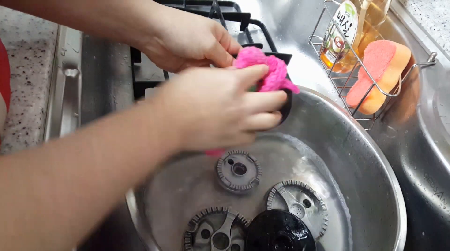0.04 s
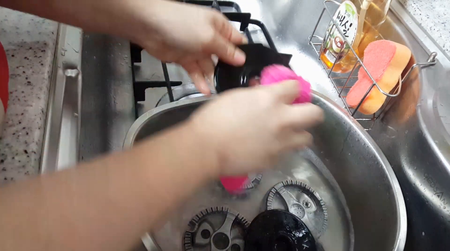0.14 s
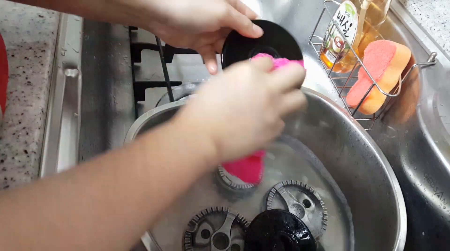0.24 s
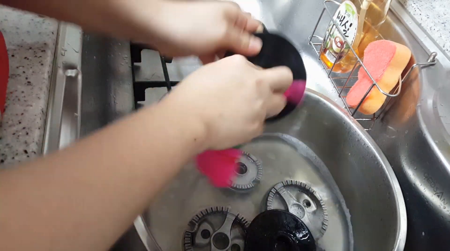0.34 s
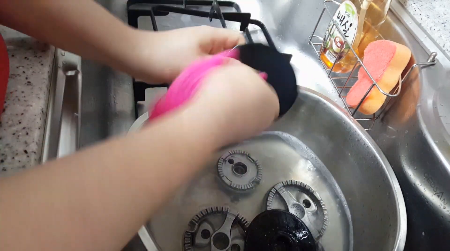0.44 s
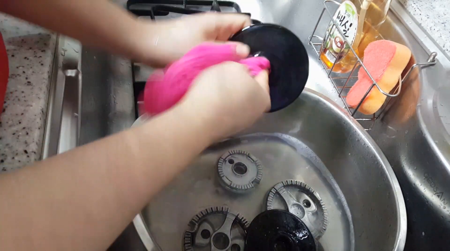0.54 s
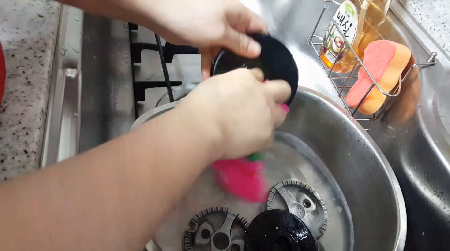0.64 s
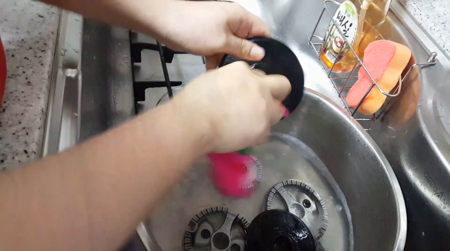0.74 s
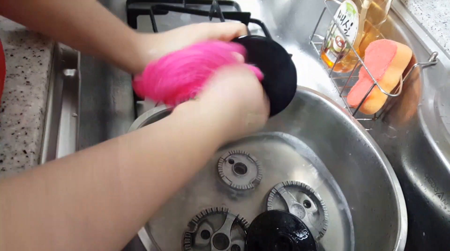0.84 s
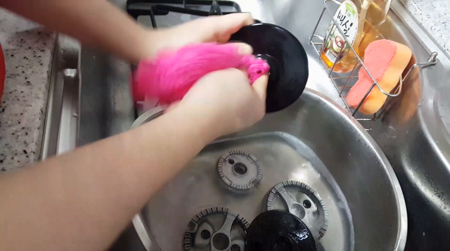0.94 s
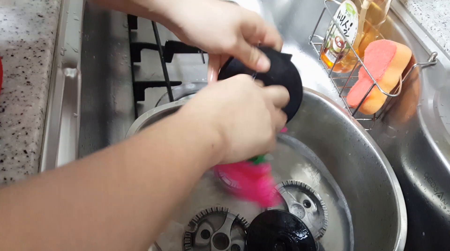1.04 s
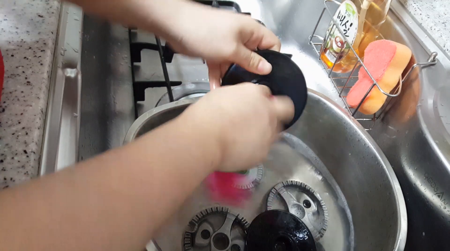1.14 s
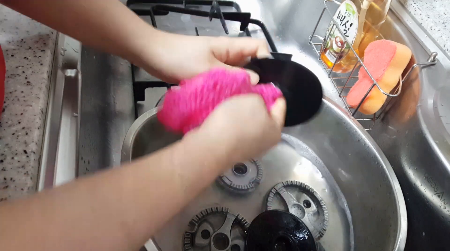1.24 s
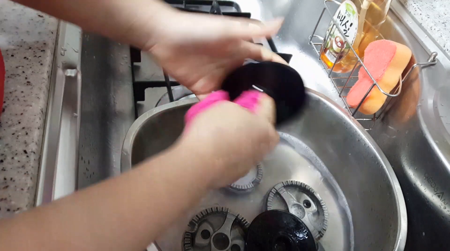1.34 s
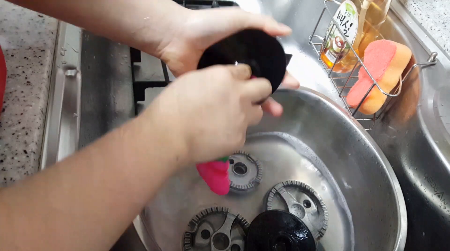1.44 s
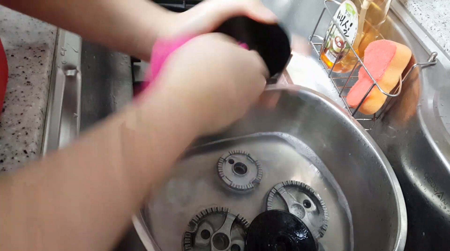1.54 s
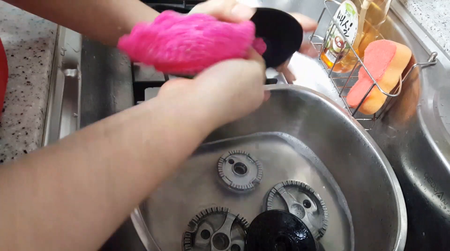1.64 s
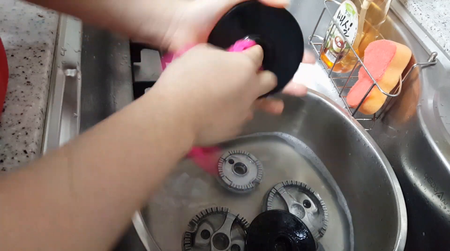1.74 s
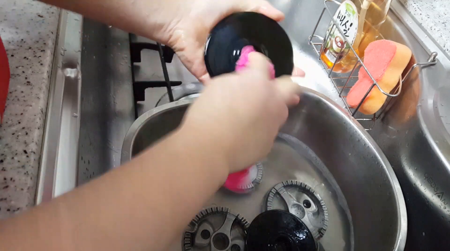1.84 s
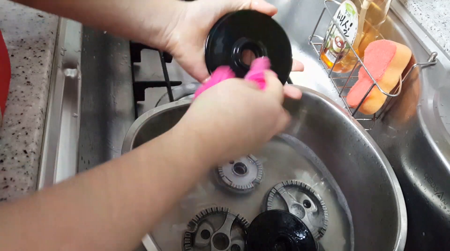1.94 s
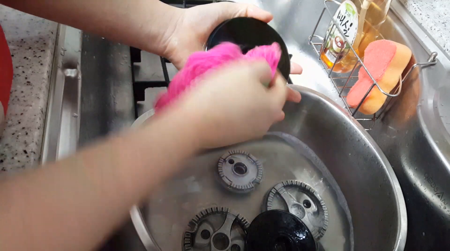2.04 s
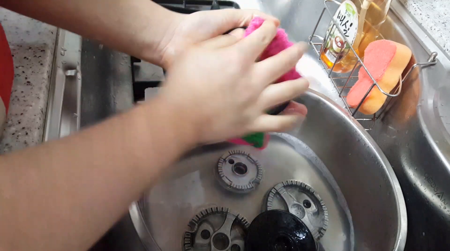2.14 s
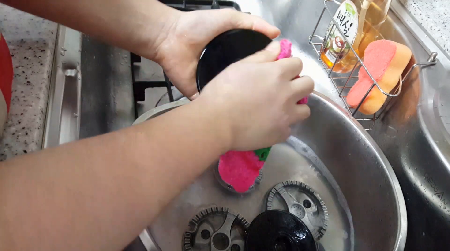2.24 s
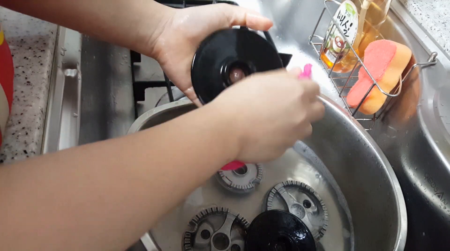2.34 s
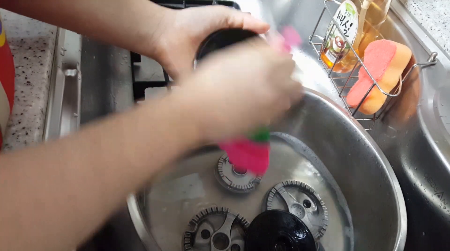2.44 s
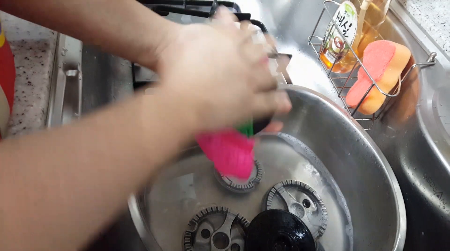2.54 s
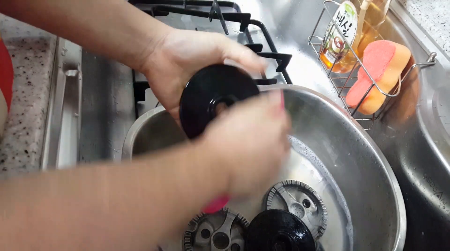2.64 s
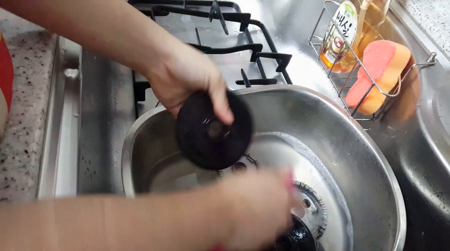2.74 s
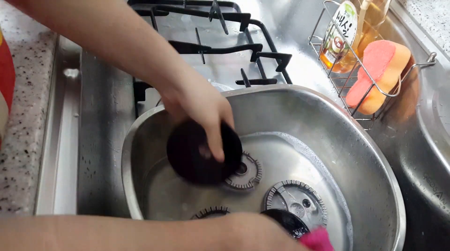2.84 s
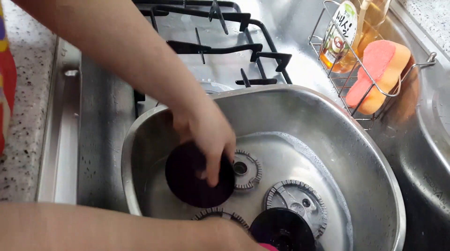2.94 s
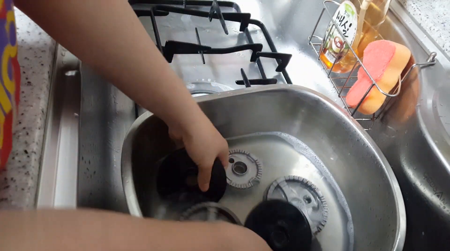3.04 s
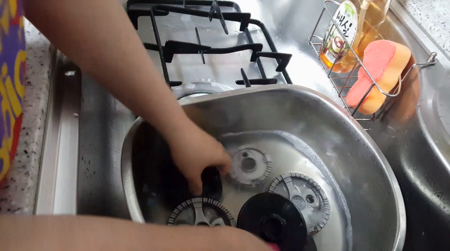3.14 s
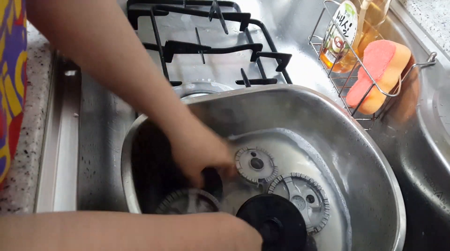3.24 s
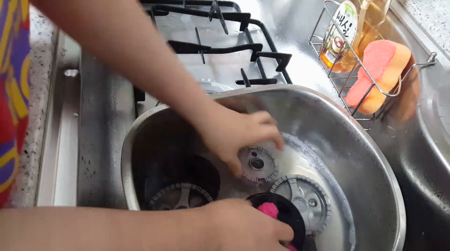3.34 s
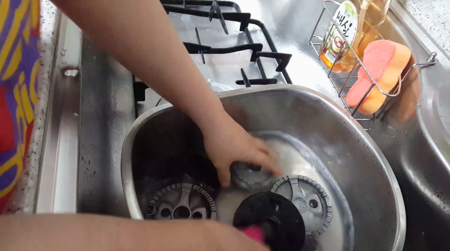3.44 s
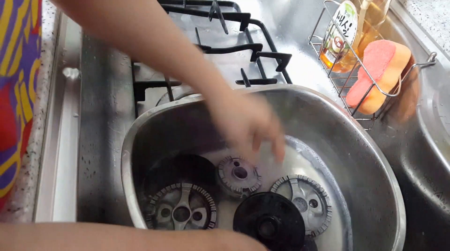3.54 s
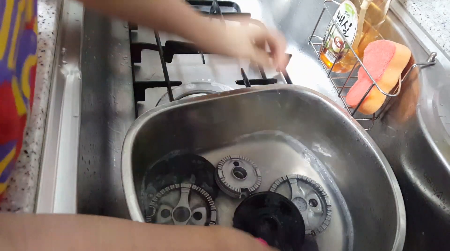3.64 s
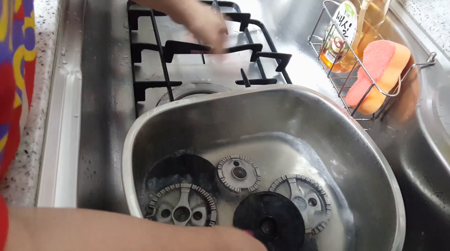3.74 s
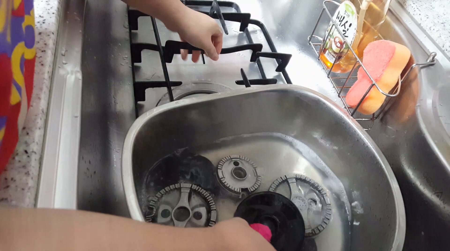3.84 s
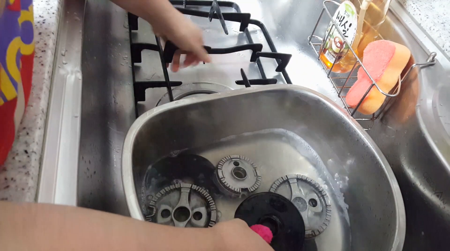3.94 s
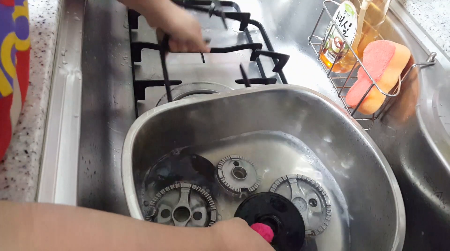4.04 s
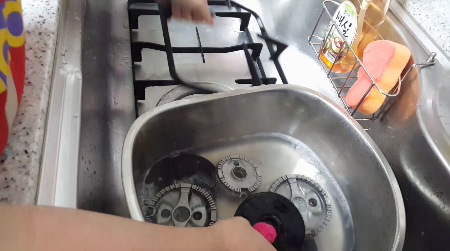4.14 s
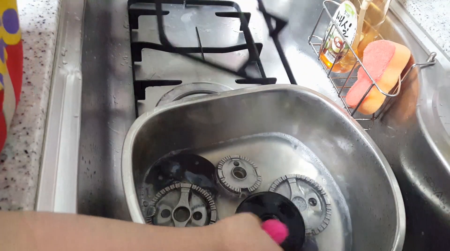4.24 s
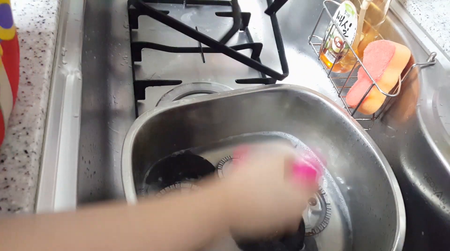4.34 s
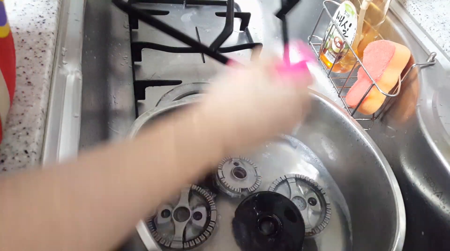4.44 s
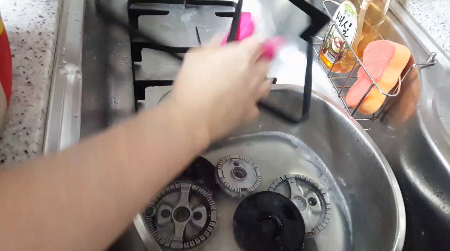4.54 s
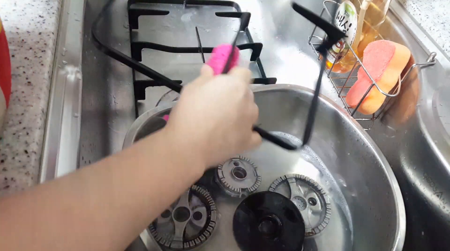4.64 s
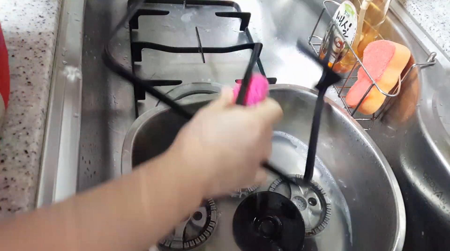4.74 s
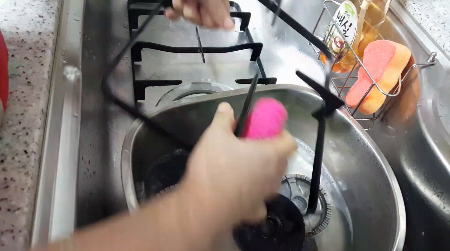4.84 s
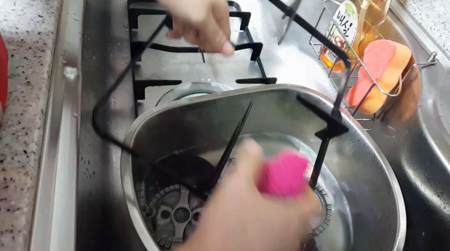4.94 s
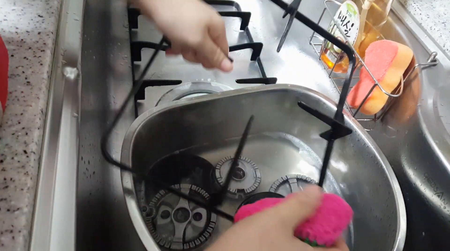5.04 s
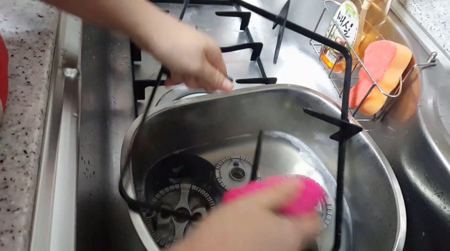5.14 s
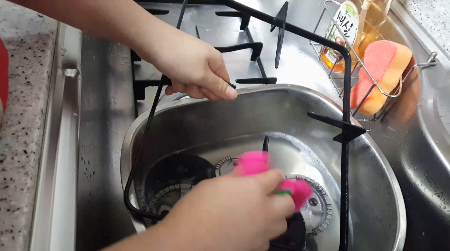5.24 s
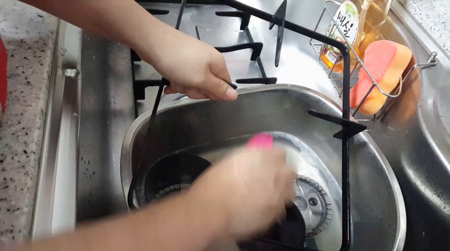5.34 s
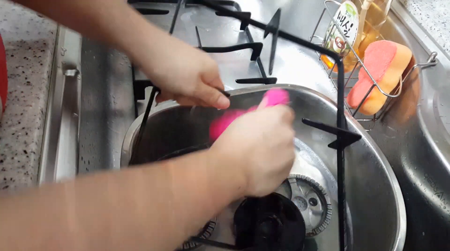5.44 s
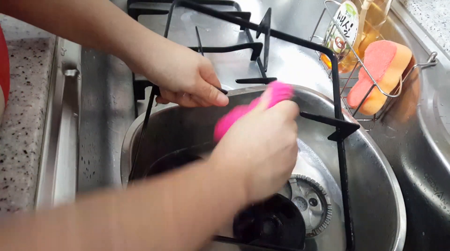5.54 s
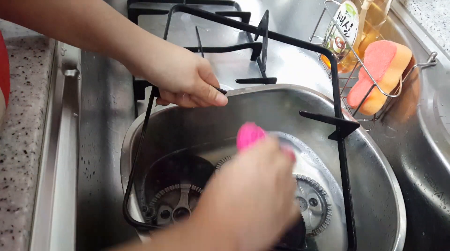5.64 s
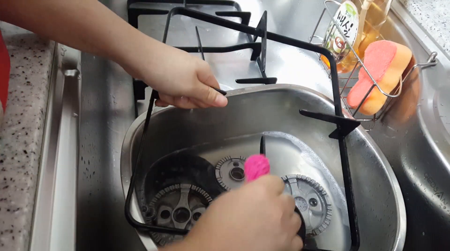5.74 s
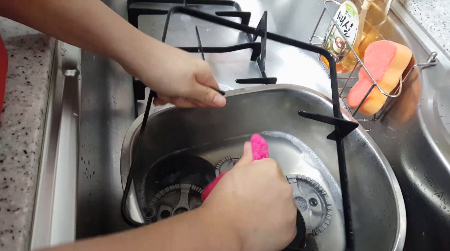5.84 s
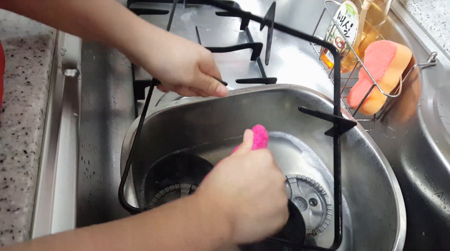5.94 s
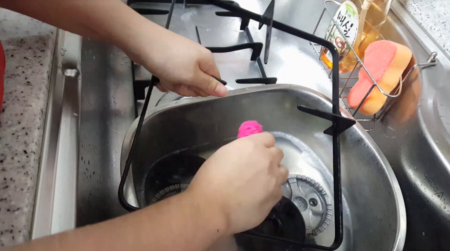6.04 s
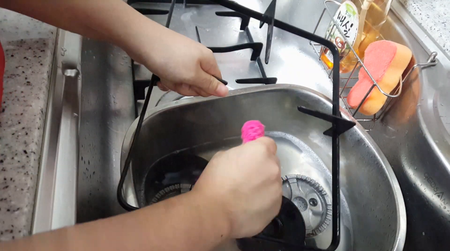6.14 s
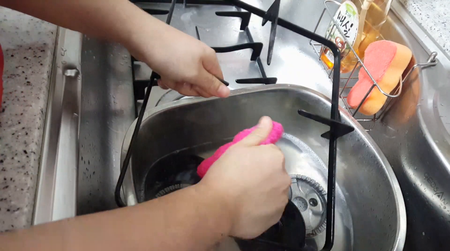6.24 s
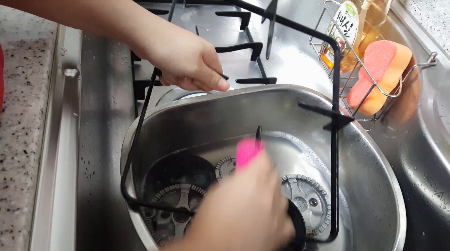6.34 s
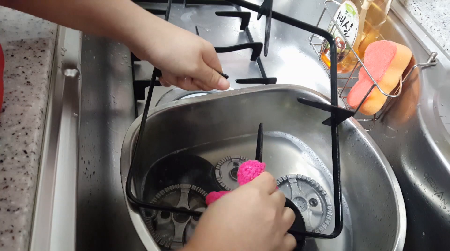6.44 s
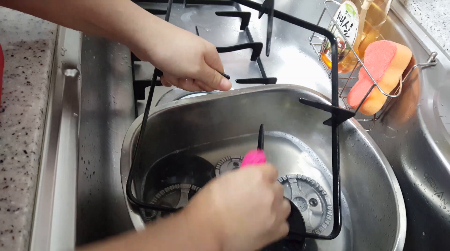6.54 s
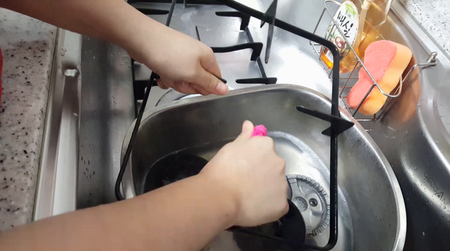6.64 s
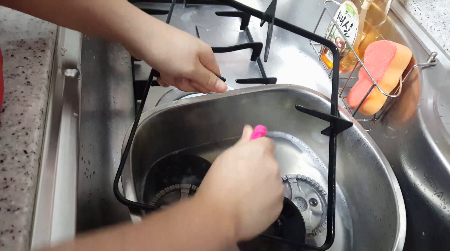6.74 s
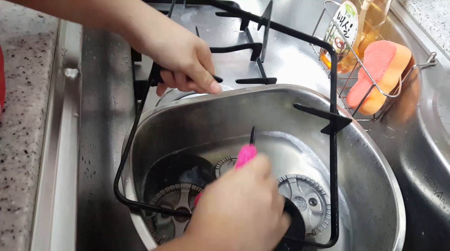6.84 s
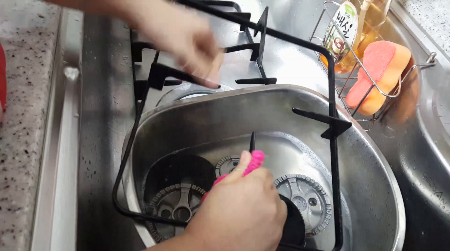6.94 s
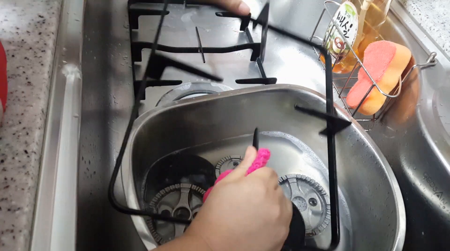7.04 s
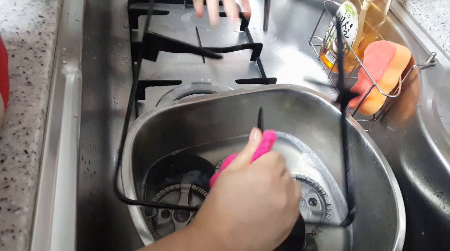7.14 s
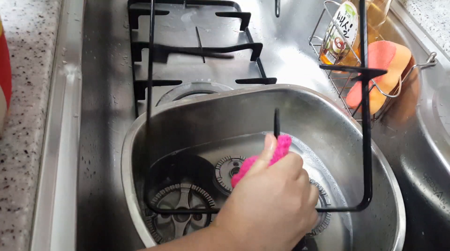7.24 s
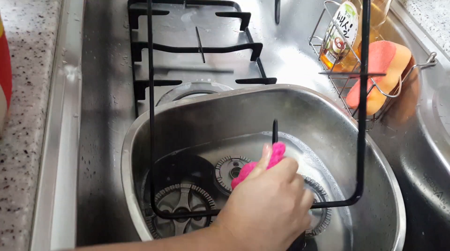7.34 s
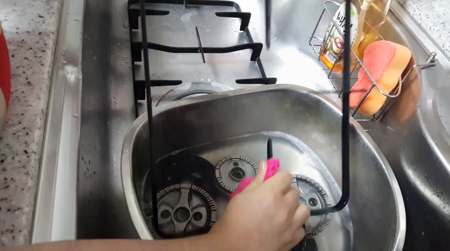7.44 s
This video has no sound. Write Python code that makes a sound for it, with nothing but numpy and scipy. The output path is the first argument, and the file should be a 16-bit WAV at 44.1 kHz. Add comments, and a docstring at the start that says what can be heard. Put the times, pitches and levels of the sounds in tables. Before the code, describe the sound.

A small kitchen heard closely in stereo, with a faint low appliance hum and short reflections from steel and walls. From 0 to 2.7 s a wet yarn scrubber makes quiet, irregular fibrous wipes on a burner cap, with a dribble of water at the start, a few bubbly drops and tiny ticks. At about 2.9 s the cap slides into the basin: gritty grinding and a loud cluster of hollow, ringing knocks, strongest from 3.05 to 3.4 s, thinning by 3.7 s with a sharp drip and low slosh. At 4.1 s the hob thuds and iron clinks brightly. Soft wipes come at 4.5 s; at 4.85 s the grate lands on the rim in a rapid bouncing clatter, then skids, with a sharp knock at 5.24 s. From 5.4 to 7 s short hard scrubs rasp and judder with changing metallic pitch, light knocks and watery boom; small drips close around 7.2 s.

```python
"""A small kitchen with a humming appliance: stove parts are washed in a steel basin of shallow water.
A wet yarn scrubber, made of random fibre flicks, wipes a burner cap, which is then slid in among the other
parts. An iron pan grate clinks off the hob, lands on the basin and is scrubbed there, juddering against the rim.
Blows ring as dying modes, slides and judder as filtered stick-slip, drops as short bubble tones.
Two close microphone ports hear it all, with reflections from sink and walls."""
import sys
import numpy as np
from scipy import signal
from scipy.fft import rfft, irfft, next_fast_len
from scipy.io import wavfile
from scipy.ndimage import uniform_filter1d

SR = 44100
rng = np.random.default_rng(int(sys.argv[2]) if len(sys.argv) > 2 else 0)


def persist_wave(psi):
    """Save psi, clipped to +-1, as 16-bit WAV."""
    counts = np.round(np.clip(psi, -1, 1) * 32767).astype(np.int16)
    wavfile.write(sys.argv[1], SR, np.atleast_2d(counts).T)


N = 330309
TIME = np.arange(N) / SR
RING = TIME[:SR * 3 // 5]  # time axis of one short sound, 0.6 s

# Crowded short-lived modes of the basin. Each row: frequency in Hz, relative level in dB.
BASIN = [(30, -8), (60, -12), (103, 3), (221, -10), (328, -1), (430, -4), (540, -3), (880, -6.5),
         (1000, -13), (2000, -16), (3200, -19.5), (5400, -27), (9300, -34), (10300, -41), (15500, -45.5)]
# Crowded short-lived modes of the grate. Each row: frequency in Hz, relative level in dB.
GRATE = [(40, -6.5), (104, 1), (240, -13), (320, -4), (400, -6.5), (520, -3.5), (670, -13), (830, -1.5),
         (1000, -12.5), (2900, -20.5), (3800, -24.5), (6000, -34.5), (8800, -38.5), (10300, -50),
         (15500, -50.5)]
# Hard strokes along the grate's bars. Each row: start in seconds, length in seconds,
# relative fibre hiss in dB, relative judder in dB, pitch that the contact favours in Hz.
SCRUBS = [(5.39, 0.083, -47, -44, 850), (5.46, 0.096, -49, -28.5, 700), (5.65, 0.2, -48.5, -41.5, 550),
          (5.855, 0.051, -48.5, -36.5, 2900), (5.97, 0.11, -52.5, -34.5, 335),
          (6.205, 0.13, -51, -42, 2140), (6.34, 0.1, -54.5, -37.5, 407), (6.41, 0.046, -42, -35, 520),
          (6.61, 0.078, -45, -33, 560), (6.79, 0.16, -52, -43, 337), (6.95, 0.043, -64, -32.5, 420)]


def undb(db):
    """Decibels to gain."""
    return 10 ** (np.asarray(db) / 20)


def unit(x):
    """Scale to rms 1."""
    return x / np.sqrt(np.mean(x ** 2))


def onset_unit(x):
    """Scale so that the loudest 12 ms have rms 1."""
    return x / np.sqrt(uniform_filter1d(x ** 2, size=512).max())


def add(track, s, sound):
    """Mix a sound in at time s."""
    start = int(s * SR)
    track[..., start:start + sound.shape[-1]] += sound[..., :N - start]


def colour(x, points):
    """Causal minimum-phase filter with the given (Hz, dB) response."""
    size = next_fast_len(len(x) // 2 + 4096) * 2
    hz, db = np.transpose(points)
    bins_hz = np.arange(size // 2 + 1) * SR / size
    response_db = np.interp(np.log(bins_hz + 1), np.log(hz), db)
    cepstrum = irfft(np.log(undb(response_db)))
    # folding the cepstrum forward in time makes the filter causal
    cepstrum[1:size // 2] *= 2
    cepstrum[size // 2 + 1:] = 0
    return irfft(rfft(x, size) * np.exp(rfft(cepstrum)))[:len(x)]


def split(x, low_hz=400, high_hz=2500):
    """Bass, middle and treble of a sound; they add up to the whole."""
    low = signal.sosfiltfilt(signal.butter(2, low_hz, "low", fs=SR, output="sos"), x)
    high = signal.sosfiltfilt(signal.butter(2, high_hz, "high", fs=SR, output="sos"), x)
    return low, x - low - high, high


def walk(rate):
    """Random wandering, spread near 1, along straight lines between `rate` knots a second."""
    knots = rng.standard_normal(4096)
    return np.interp(TIME * rate, np.arange(len(knots)), knots)


def slips(rate, spread_db):
    """Tiny stick-slip releases of either sign and unequal size, about `rate` a second at random times."""
    happens = rng.random(N) < rate / SR
    sign = rng.choice([-1, 1], N)
    size_db = spread_db * np.clip(rng.standard_normal(N), -2, 2)
    return happens * sign * undb(size_db)


def fade(t60):
    """A ring that falls 60 dB in t60 seconds."""
    return np.exp(-np.log(1000) * RING / t60)


def gesture(s, length_s, attack_s, t60, arch_db=0):
    """Envelope of one movement: it builds up, is held with a swell in the middle, and dies away."""
    age = np.maximum(TIME - s, 0)
    swell_db = arch_db * (np.sin(np.pi * np.minimum(age / length_s, 1)) - 1)
    release = np.exp(-np.log(1000) * np.maximum(age - length_s, 0) / t60)
    return np.minimum(age / attack_s, 1) * undb(swell_db) * release


def ports(x, lag_ms, pan_db):
    """Two microphone ports hear the source a moment apart; a positive lag reaches the first port late."""
    t = TIME[:len(x)]
    late = np.interp(t - np.round(lag_ms * SR / 1000) / SR, t, x)
    return np.array([late * undb(pan_db / 2), x * undb(-pan_db / 2)])


def blows(events, modes, crowd, ring_db, low_t60, mid_t60, high_t60, crack_db, lag_ms, pan_db):
    """Each blow chatters briefly and rings a body: a crack, a crowd of dying modes and a few clear ones."""
    track = np.zeros((2, N))
    for s, body_db, thump_db, edge_db, chatter_s in events:
        bands = split(rng.standard_normal(len(RING)))
        dense = sum(band * fade(t60) for band, t60 in zip(bands, (low_t60, mid_t60, high_t60)))
        crack = rng.standard_normal(len(RING)) * np.exp(-RING / max(chatter_s, 1 / SR))
        onset = 1 - np.exp(-RING / 0.0015)
        sound = onset_unit(colour((dense + undb(crack_db) * crack) * onset, crowd))
        if len(modes):
            ring = np.zeros(len(RING))
            for hz, db, t60 in modes:
                # where the blow lands sets each mode's share
                share = undb(db + rng.standard_normal())
                ring += share * fade(t60) * np.sin(2 * np.pi * (hz * RING + rng.random()))
            sound = sound + undb(ring_db) * onset_unit(ring * (1 - np.exp(-RING / 0.0054)))
        levels_db = (thump_db, body_db, edge_db)
        sound = sum(undb(db) * onset_unit(band) for band, db in zip(split(sound), levels_db))
        # each contact lies at a slightly different bearing
        add(track, s, ports(sound, lag_ms + .08 * rng.standard_normal(), pan_db))
    return track


def kitchen():
    """An appliance hums in wavering tones under the room's still air, whose bass nearly agrees at both ports."""
    # Hum of the appliance. Each row: frequency in Hz, mean level in dB.
    hum_tones = [(64.6, -51.5), (188.4, -64.5), (289, -67), (387.6, -67)]
    # Colour of the room air. Each row: frequency in Hz, relative level in dB.
    air_colour = [(25, -14), (45, -8), (80, -6), (120, 0), (165, -9), (300, -11), (420, -15), (630, -26),
                  (790, -23), (1100, -28), (4000, -34), (8300, -36), (10000, -41), (16000, -43)]
    hum = np.zeros(N)
    for hz, db in hum_tones:
        level = undb(db + 0.43 * walk(4.8)) * np.sqrt(2)
        hum += level * np.sin(2 * np.pi * hz * TIME + .12 * walk(2.6))
    shared = rng.standard_normal(N)
    spread = colour(rng.standard_normal(N), [(60, -24.5), (300, -8.5), (1000, 1.5), (3000, 0)])
    air = np.array([unit(colour(shared + sign * spread, air_colour)) for sign in (1, -1)])
    return hum + undb(-53.5) * air * undb(0.51 * walk(9.4))


def scrubber():
    """Wet fibres flick over the metal and foam crackles; the hand rests while the parts are moved."""
    # Colour of the wet yarn on metal. Each row: frequency in Hz, relative level in dB.
    fibre_colour = [(530, -22.5), (900, -6), (1420, -12), (1900, -4), (2690, -5.5), (3510, -5.5),
                    (4980, -7), (8550, -5), (10500, -13.5), (15100, -18), (16000, -23)]
    # Light wipes over the burner cap, resumed after the parts are moved. Each row: start in seconds, length in
    # seconds, relative fibre hiss in dB.
    wipes = [(0, 0.052, -50.5), (.13, 0.078, -55), (.33, 0.41, -59), (.81, 0.13, -56.5), (.99, 0.11, -56),
             (1.2, 0.093, -58.5), (1.565, 0.071, -52.5), (1.735, .1, -54.5), (1.89, 0.045, -59),
             (2.0, 0.035, -70), (2.19, 0.081, -57.5), (2.555, 0.14, -54.5), (2.68, 0.072, -67),
             (4.525, 0.11, -47.5), (4.66, 0.47, -60.5)]
    fibres = unit(colour(slips(rate=4400, spread_db=4) * undb(3.1 * walk(60)), fibre_colour))
    foam = unit(colour(slips(rate=230, spread_db=5), fibre_colour))
    pressure = np.zeros(N)
    for s, length_s, hiss_db, *_ in list(wipes) + list(SCRUBS):
        # the hand is fastest in mid-stroke
        pressure += undb(hiss_db) * gesture(s, length_s, attack_s=0.02, t60=0.32, arch_db=5.5)
    return pressure * (undb(3) * fibres + undb(-16.5) * foam)


def dribbles():
    """Water squeezed from the scrubber patters in quick uneven spurts, ever more thinly."""
    # Colour of the dribbling water. Each row: frequency in Hz, relative level in dB.
    water_colour = [(59, -30.5), (100, 7.5), (189, 2), (227, -22), (299, 6.5), (402, -13.5), (531, -1),
                    (973, -13), (2770, -20), (5000, -45), (6500, -66.5), (11000, -120)]
    # Each row: start in seconds, relative level in dB, 60 dB decay time in seconds.
    squeezes = [(0.024, -38.5, 0.29), (0.132, -45.5, 3), (2.55, -64, .6)]
    spurt_phase = (21 * TIME + .1 * walk(15)) % 1  # about 21 spurts a second
    spurts = .15 + np.exp(-spurt_phase / .22)
    flow = sum(undb(db) * gesture(s, length_s=.04, attack_s=0.008, t60=t60) for s, db, t60 in squeezes)
    patter = unit(colour(slips(rate=2200, spread_db=4.5) * spurts, water_colour))
    return undb(-1.0) * patter * flow


def sloshing():
    """The water set swaying makes the basin floor boom: low filtered noise that swells and dies."""
    # Each row: start in seconds, length in seconds, relative level in dB.
    sloshes = [(0.026, .6, -45.5), (.81, 0.12, -46), (1.044, 0.063, -58), (1.872, 0.04, -46.5),
               (2.863, .18, -33.5), (3.688, 0.45, -42.5), (4.674, .06, -43.5), (5.52, 1.63, -44)]
    boom_colour = [(60, -21.5), (100, 1), (115, -2.5), (145, -16.5), (180, -7), (260, -40), (1000, -75.0)]
    boom = unit(colour(rng.standard_normal(N), boom_colour))
    sway = sum(undb(db) * gesture(s, length_s, attack_s=.03, t60=0.27) for s, length_s, db in sloshes)
    return undb(-2.5) * boom * sway


def drops():
    """Larger drops fall from the scrubber: each splashes and traps a bubble that rings briefly."""
    # Each row: start in seconds, relative level in dB, bubble pitch in Hz.
    falls = [(.05, -48.5, 748), (0.138, -38.5, 2770), (.771, -40.5, 1790), (2.563, -53, 1770),
             (3.691, -30.5, 3740), (3.759, -39, 964), (4.756, -42, 5730), (6.037, -39.5, 1380),
             (7.167, -52.5, 4570), (7.217, -50.5, 7520), (7.335, -41, 3030)]
    track = np.zeros(N)
    for s, db, hz in falls:
        cycles = hz * RING
        bubble = np.sin(2 * np.pi * cycles) * np.exp(-cycles / 20)
        splash = rng.standard_normal(len(RING)) * np.exp(-RING / 0.01)
        splash = colour(splash, [(hz / 2, -20), (hz, 0), (hz * 2, -18), (hz * 6, -34)])
        add(track, s, undb(db) * onset_unit(bubble + 1.2 * splash))
    return track


def snaps():
    """Sharp ticks of grit, snagging yarn and spray: fast-dying noise, each with its own treble."""
    # Each row: start in seconds, relative level in dB, tilt towards the top in dB.
    ticks = [(0.402, -52, -17), (1.398, -60, 12), (2.173, -39.5, 13), (2.493, -51.5, 9), (2.561, -44.5, 0),
             (2.968, -30.5, -7), (3.475, -31.5, 3), (3.54, -25.5, -9), (3.695, -35.5, -35),
             (4.551, -34.5, 17), (4.627, -42.5, 21), (4.827, -44, -4), (5.03, -26, 10.5), (5.096, -27.5, 4),
             (6.133, -34, -9.5), (6.205, -39.5, -11)]
    track = np.zeros(N)
    for s, db, tilt_db in ticks:
        burst = rng.standard_normal(len(RING)) * np.exp(-RING / 0.011)
        tilt = [(600, -8.0), (2000, -9.0), (9000, tilt_db), (15000, 1.77 * tilt_db - 19.0)]
        add(track, s, undb(db - 2) * onset_unit(colour(burst, tilt)))
    return track


def sliding():
    """Cast parts grind over the thin basin floor in small slips; the grit catches in fits."""
    # Colour of the grit. Each row: frequency in Hz, relative level in dB.
    grit_colour = [(900, -19.5), (2000, 17.5), (3200, 11), (5400, -8), (9300, -18), (10300, -11),
                   (15500, -18.5)]
    # Parts shoved over the basin floor, last the grate over the hob.
    # Each row: start in seconds, length in seconds, relative rumble in dB, relative grit in dB.
    shoves = [(2.862, 0.2, -28, -38.5), (3.116, 0.18, -29, -40.5), (3.276, .125, -23, -38),
              (3.462, 0.074, -31, -38), (3.587, 0.02, -22.5, -38), (3.698, 0.063, -42, -52.5),
              (4.022, 0.13, -37, -57.5)]
    rumble = unit(colour(slips(rate=1000, spread_db=2.5), BASIN))
    grit = unit(colour(slips(rate=490, spread_db=4.0) * undb(7.2 * walk(57)), grit_colour))
    grinding = np.zeros(N)
    for s, length_s, rumble_db, grit_db in shoves:
        shove = gesture(s, length_s, attack_s=0.028, t60=0.35, arch_db=3.5)
        grinding += (undb(rumble_db) * rumble + undb(grit_db) * grit) * shove
    return undb(-2.0) * grinding


def knocking_parts():
    """Parts knock on the basin and ring its thin steel."""
    # Each row: start in seconds, relative body, thump and edge in dB, chatter time constant in seconds.
    knocks = [(2.881, -38.5, -23, -32.5, 0.019), (2.967, -48.5, -29, -29.5, 0.0021),
              (3.021, -23, -24, -27.5, 0.0017), (3.067, -9, -13.5, -14.5, 0.003),
              (3.081, -18, -11.5, -29, 0.0036), (3.207, -21.5, -41, -18.5, 0.014),
              (3.274, -14, -17.5, -20.5, 0.0021), (3.282, -10.5, -47, -20.5, 0.005),
              (3.302, -28, -12.5, -20.5, 0.018), (3.31, -11.5, -51.5, -41.5, 0.0056),
              (3.374, -10.5, -53.5, -23.5, 0.0071), (3.388, -17, -26.5, -53, 0.0099),
              (3.409, -42, -21.5, -43, 0.0048), (3.473, -38, -19, -30.5, 0.0021),
              (3.511, -21, -28.5, -31, 0.0045), (3.544, -22, -25, -41, 0.0038),
              (3.618, -16, -45.5, -24.5, 0.0097), (3.639, -38, -42.5, -56, 0.0056)]
    # Clear modes of the basin. Each row: frequency in Hz, relative level in dB, 60 dB decay in seconds.
    basin_modes = [(106.6, -1, 0.88), (178.3, -1.5, 0.58), (295, -11, 0.27), (337, 8.5, 0.34),
                   (378, 2, 0.031), (492, 6.5, 0.13), (526, 8.5, 0.22), (640, -4.5, 0.061),
                   (763, -3.5, 0.45), (799.5, 6, 0.14), (840, -3, 0.18), (1140, 0.5, 0.27), (1357, 1, 0.2),
                   (1900, -10.5, 0.28)]
    return undb(-4.5) * blows(knocks, basin_modes, BASIN, ring_db=-5.5, low_t60=0.33, mid_t60=0.26,
                              high_t60=0.18, crack_db=7.0, lag_ms=.08, pan_db=-0.5)


def bumped_hob():
    """The hob's sheet metal is bumped: a crowd of modes without clear tones."""
    # Each row: start in seconds, relative body, thump and edge in dB, chatter time constant in seconds.
    bumps = [(3.852, -45, -42, -60, 0.0027), (3.951, -49.5, -36.5, -60.5, 0.0023),
             (4.105, -12.5, -13, -19, 0.0065), (4.117, -17.5, -20.5, -20.5, 0.0087),
             (4.161, -34, -25.5, -45, .005)]
    # Crowded modes of the hob. Each row: frequency in Hz, relative level in dB.
    hob_crowd = [(40, -7.5), (110, -1), (180, 6.5), (245, -11), (311, 4.5), (450, -6), (502, 4.5),
                 (640, -14), (950, -10.5), (1200, -22.5), (3000, -22), (12000, -39.5)]
    return undb(-6.5) * blows(bumps, [], hob_crowd, ring_db=0, low_t60=0.28, mid_t60=0.32,
                              high_t60=0.046, crack_db=9, lag_ms=-0.15, pan_db=0.5)


def clinking_iron():
    """Iron clinks on iron as the grate leaves the hob, ringing high modes."""
    # Each row: start in seconds, relative body, thump and edge in dB, chatter time constant in seconds.
    clinks = [(4.0895, -20.5, -30.5, -13, 0.0016), (4.096, -17.5, -35, -10, 0.0046)]
    # Clear modes of the iron. Each row: frequency in Hz, relative level in dB, 60 dB decay in seconds.
    iron_modes = [(2950, -25, .25), (3068, -20, 0.34), (3428, -7, 0.48), (3558, -5.5, .24),
                  (3920, -19.5, 0.79), (4230, -8, 0.31), (4490, -13, 0.19), (5300, -16, 0.27),
                  (6400, 17, 0.061), (7080, -17.5, .3), (7760, 1.5, 0.17), (8270, 1, 0.38),
                  (8500, -2, 0.26), (8753, 2.5, 0.14), (9670, -9, .22), (11000, 1.5, 0.073),
                  (12600, -10.5, 0.14), (12800, -5, 0.14), (13800, -3, 0.12)]
    # Crowded modes of the iron. Each row: frequency in Hz, relative level in dB.
    iron_crowd = [(200, -9), (950, -18), (2000, -19.5), (3600, -1.5), (5000, -4.5), (6400, -4), (8600, 4.5),
                  (11000, -1.5), (14300, -9.5), (15500, -22.5)]
    # the grate's many bars add faint overtones; the higher ones die sooner
    overtones = [(hz, -15, 0.27 * np.sqrt(2000 / hz)) for hz in rng.uniform(4200, 12000, size=30)]
    return undb(-5) * blows(clinks, list(iron_modes) + overtones, iron_crowd, ring_db=-10, low_t60=0.08,
                            mid_t60=0.14, high_t60=0.038, crack_db=8.5, lag_ms=-.25, pan_db=0)


def landing_grate():
    """The grate drops on the basin's free rim and bounces, ringing the rim."""
    # Each row: start in seconds, relative body, thump and edge in dB, chatter time constant in seconds.
    landings = [(4.853, -11, -31.5, -14, 0.006), (4.865, -13.5, -16, -11, 0.0016),
                (4.881, -12, -41.5, -40, 0.01), (4.902, -15.5, -22.5, -28, .006),
                (4.922, -16.5, -34, -26, 0.0033), (4.94, -20, -21.5, -44, 0.015)]
    # Clear modes of the free rim. Each row: frequency in Hz, relative level in dB, 60 dB decay in seconds.
    rim_modes = [(107.3, -4.5, 0.29), (179, -7.5, 0.38), (316, -3.5, 0.2), (773, 2.5, 0.34),
                 (866, 3.5, .22), (893, -6, 0.074), (1143, -7.5, 0.2), (1304, -5.5, .18),
                 (1433, -5.5, 0.12), (1490, -15, 0.059), (1673, -11.5, 0.12), (2890, -3.5, 0.073),
                 (2984, -22.5, 0.17)]
    return undb(-3.0) * blows(landings, rim_modes, GRATE, ring_db=3.0, low_t60=0.3, mid_t60=0.32,
                              high_t60=0.11, crack_db=2.0, lag_ms=0.18, pan_db=-1)


def judder():
    """Strokes make the grate creep over the rim in small slips; the shifting contact favours changing resonances."""
    # Resonances of the grate pressed on the rim. Each row: frequency in Hz, width in Hz, relative level in dB.
    resonances = [(334.5, 13, 1), (498, 11, -13.5), (533, 24, -3), (868, 50, -1), (1092, 64, -11),
                  (1294, 42, -13), (1630, 47, -10), (1890, 44, -9), (2086, 116, -10), (2620, 66, -16),
                  (2907, 46, -7)]
    # Colour of the rasp. Each row: frequency in Hz, relative level in dB.
    rasp_colour = [(35, -16), (60, -10.5), (106, -7), (240, -25), (329, 0.5), (443, -15), (553, -0.5),
                   (641, -15), (846, -3.5), (963, -29), (1470, -24), (2100, -21), (5000, -24), (6500, -80),
                   (11000, -120)]
    # The grate skidding into place on the rim.
    # Each row: start in seconds, length in seconds, relative level in dB, pitch that the contact favours in Hz.
    skids = [(4.96, 0.15, -31.5, 800), (5.24, 0.052, -27.5, 2120)]
    force = colour(slips(rate=1000, spread_db=0.5), [(100, -10.5), (280, 4.5), (3100, 2.5), (6000, -13)])
    rings = []
    for hz, width_hz, db in resonances:
        wander = undb(8.6 * np.tanh(walk(11)))
        rings.append(undb(db) * wander * signal.lfilter(*signal.iirpeak(hz, hz / width_hz, fs=SR), force))
    rings = np.array(rings)
    rasp = unit(colour(slips(rate=460, spread_db=1.5), rasp_colour))
    track = np.zeros(N)
    for s, length_s, *_, db, contact_hz in list(skids) + list(SCRUBS):
        octaves = np.log2(np.array(resonances)[:, 0] / contact_hz)
        lift_db = 8.5 * np.exp(-(octaves / 0.6) ** 2)  # resonances near the favoured pitch
        ring = unit(undb(lift_db) @ rings)
        stroke = gesture(s, length_s, attack_s=0.021, t60=0.42, arch_db=2.5)
        track += undb(db) * (undb(-3.5) * ring + undb(-7.5) * rasp) * stroke
    return track


def rocking_grate():
    """The held grate rocks against the basin, ringing its own modes."""
    # Each row: start in seconds, relative body, thump and edge in dB, chatter time constant in seconds.
    rocks = [(5.028, -29, -26, -28.5, 0.0012), (5.095, -30.5, -31, -28, 0.04),
             (5.158, -37, -34, -32.5, 0.016), (5.24, -19, -22, -13.5, 0.0079),
             (5.46, -32, -34, -39.5, 0.0067), (5.505, -22.5, -52, -55, .008),
             (5.527, -29.5, -33, -57, 0.004), (6.646, -21.5, -51, -36, 0.018),
             (6.673, -20.5, -33, -35, 0.0049), (6.965, -44, -35, -41, 0.0058)]
    # Clear modes of the held grate. Each row: frequency in Hz, relative level in dB, 60 dB decay in seconds.
    grate_modes = [(112.6, -21, 0.73), (344, -8, 0.17), (507, -4, 0.16), (550.4, 7, 0.1), (852, 1.5, 0.23),
                   (829, 0, 0.14), (1116, -2, 0.15), (1214, -15, 0.2), (1788, -8, 0.15),
                   (1997, -12.5, 0.35), (2094, -9, 0.22), (2200, -7.5, 0.11), (2812, -3.5, 0.092)]
    return undb(-3.0) * blows(rocks, grate_modes, GRATE, ring_db=-2.0, low_t60=0.28, mid_t60=0.31,
                              high_t60=0.057, crack_db=12.5, lag_ms=0.13, pan_db=-0.5)


def scatter(span_s):
    """A dying cloud of reflections with a near-even spectrum; a longer span dies more slowly."""
    cloud = rfft(rng.standard_normal(len(RING)) * fade(span_s) * (RING > .002))
    return irfft(cloud / np.abs(cloud)) * np.exp(-(2 * RING / span_s) ** 2)


def room(x):
    """The steel sink throws sound in from the front and the sides; the kitchen walls add a short tail."""
    source = x[1]
    front, sink, tail, side_tail = (signal.fftconvolve(source, scatter(span_s))[:N]
                                    for span_s in (.1, .13, .3, .35))
    front_colour = [(200, -15), (1200, -7), (3000, 1), (6000, -6.5), (10000, 1), (16000, -2.5)]
    side_colour = [(100, -14.5), (350, -5), (900, 3), (3000, -2.5), (16000, -6)]
    ahead = colour(undb(-8.5) * front, front_colour)
    side = colour(undb(-7.5) * sink + undb(-20.0) * side_tail, side_colour)
    # sound from the sides reaches the two ports with opposite sign
    return ahead + undb(-14) * tail + np.array([side, -side])


def scene():
    """All sources, the close steel sink around them and the kitchen walls."""
    air = kitchen()
    hand = ports(scrubber() + snaps(), lag_ms=0.056, pan_db=-2.5)
    basin = ports(dribbles() + sloshing() + drops() + sliding() + judder(), lag_ms=0.16, pan_db=0.5)
    clatter = knocking_parts() + bumped_hob() + clinking_iron() + landing_grate() + rocking_grate()
    direct = hand + basin + clatter
    return direct + room(direct) + air


def record(dry):
    """The recorder clips at full scale and cuts the top above 15.9 kHz."""
    low_pass = signal.ellip(8, .2, 70, 15900, fs=SR, output="sos")
    return signal.sosfilt(low_pass, np.clip(dry, -1, 1))


dry = scene()
out = record(dry)
persist_wave(out)
```